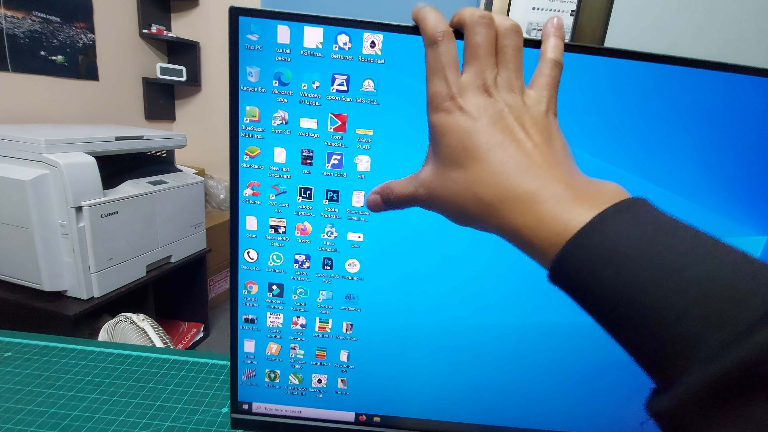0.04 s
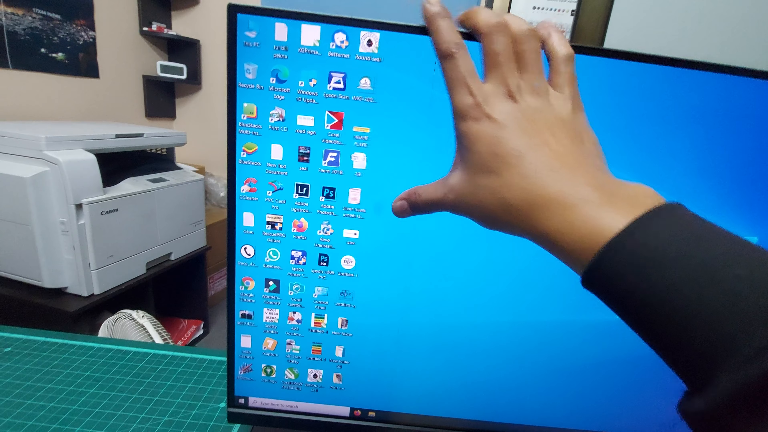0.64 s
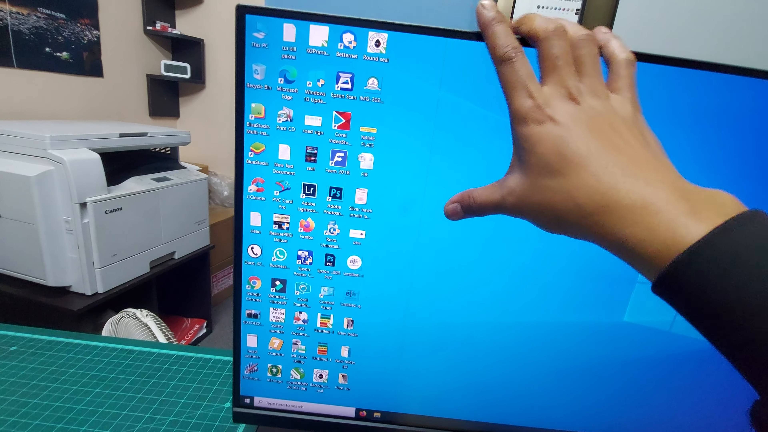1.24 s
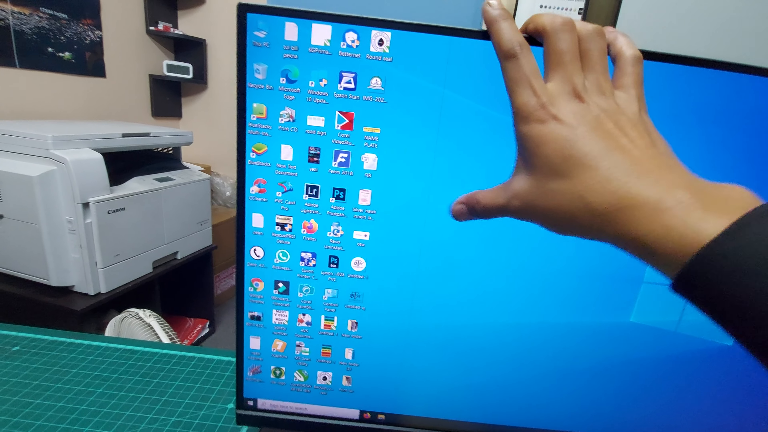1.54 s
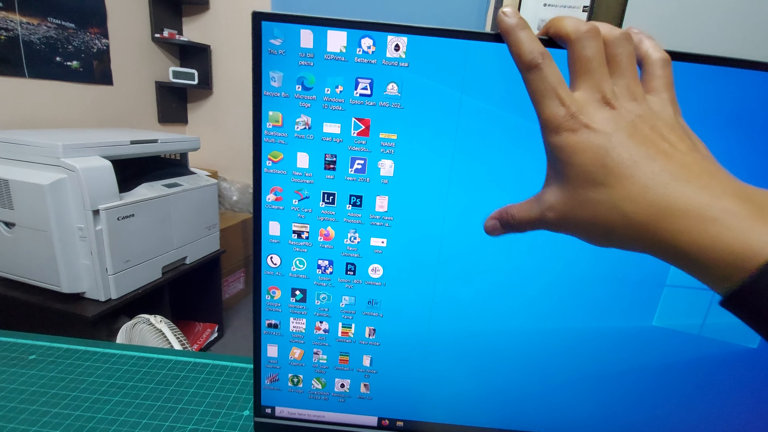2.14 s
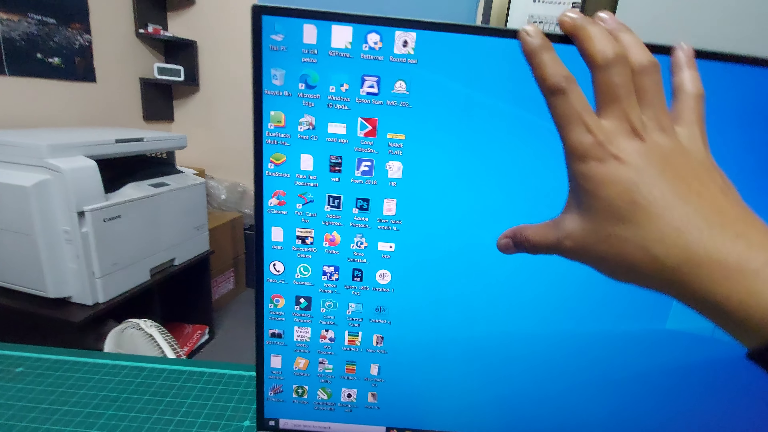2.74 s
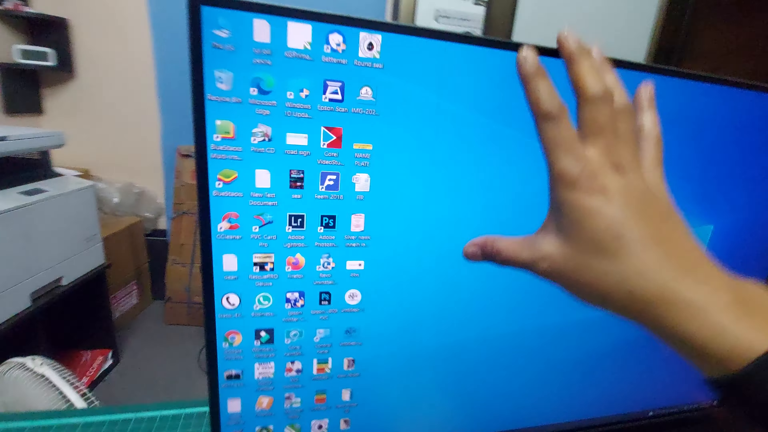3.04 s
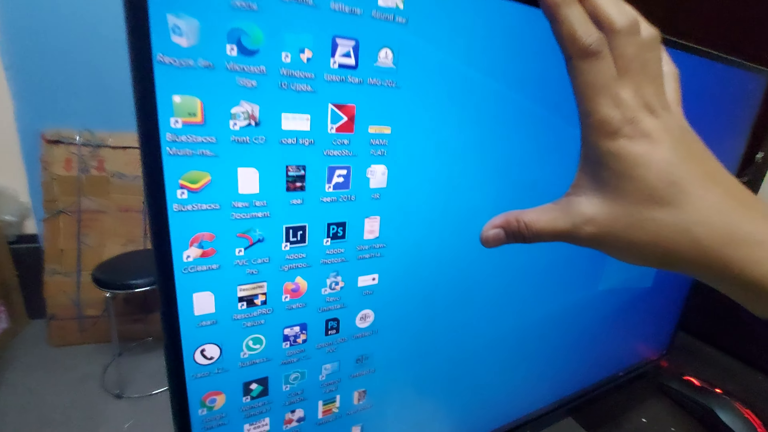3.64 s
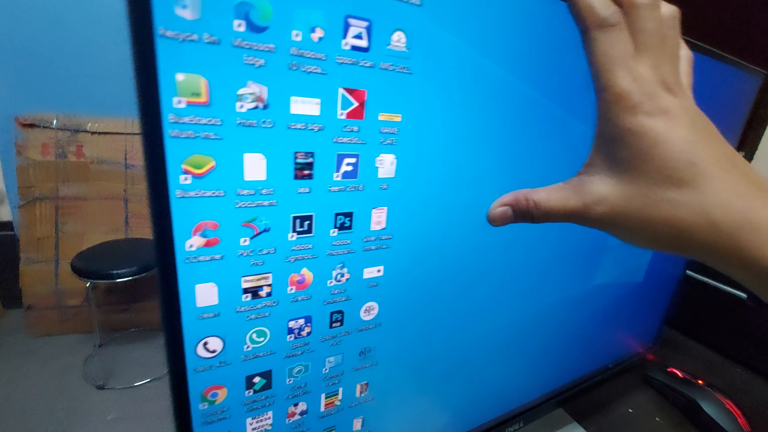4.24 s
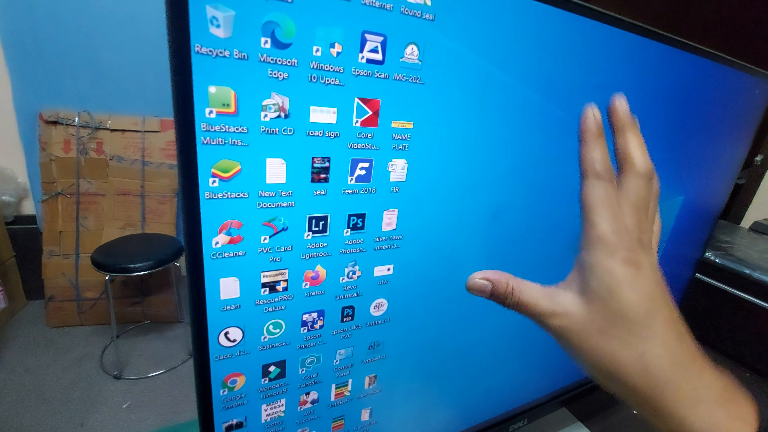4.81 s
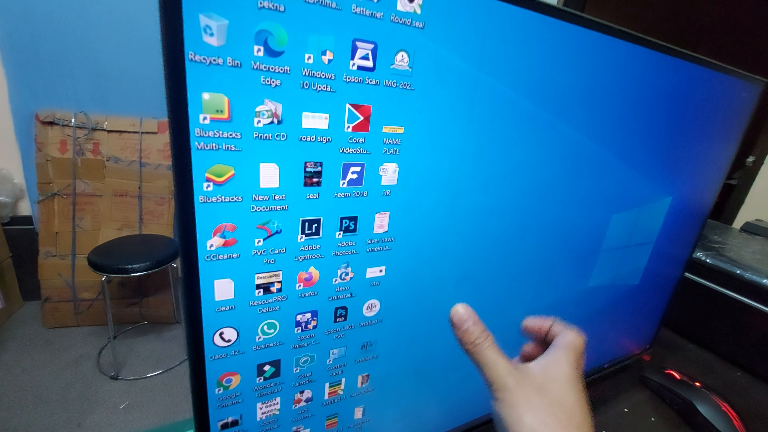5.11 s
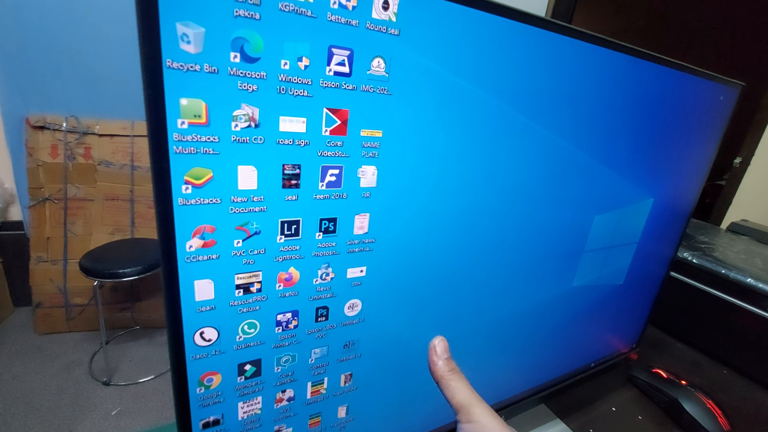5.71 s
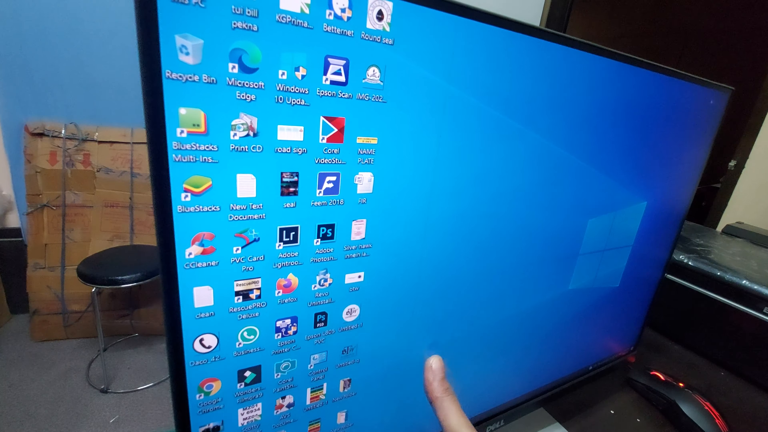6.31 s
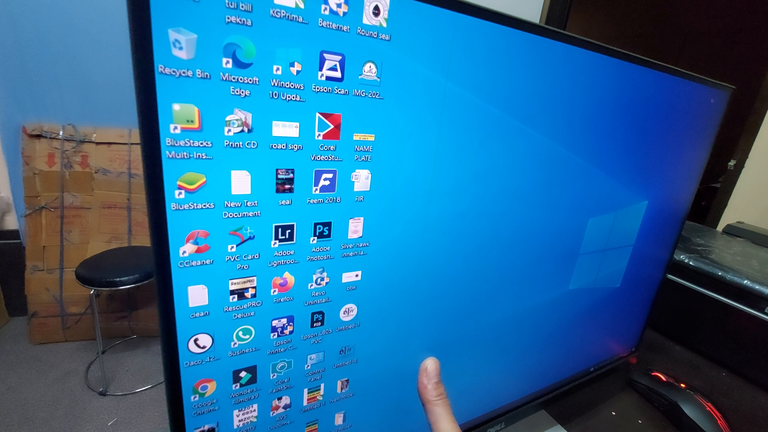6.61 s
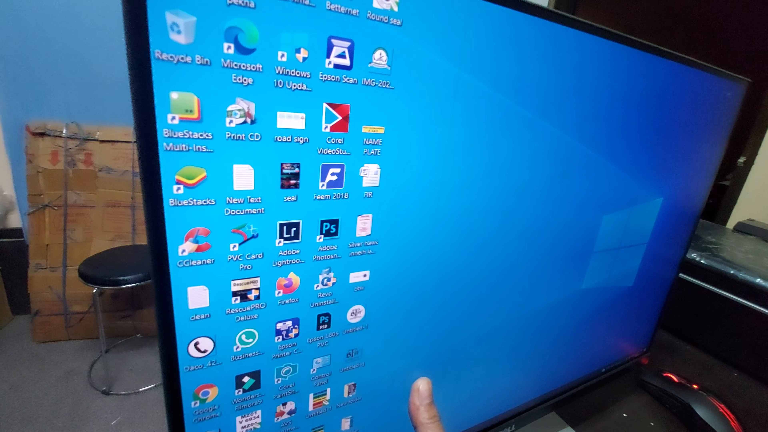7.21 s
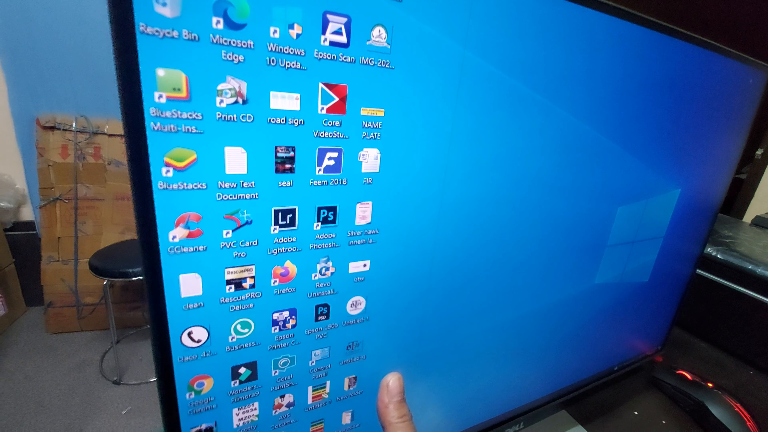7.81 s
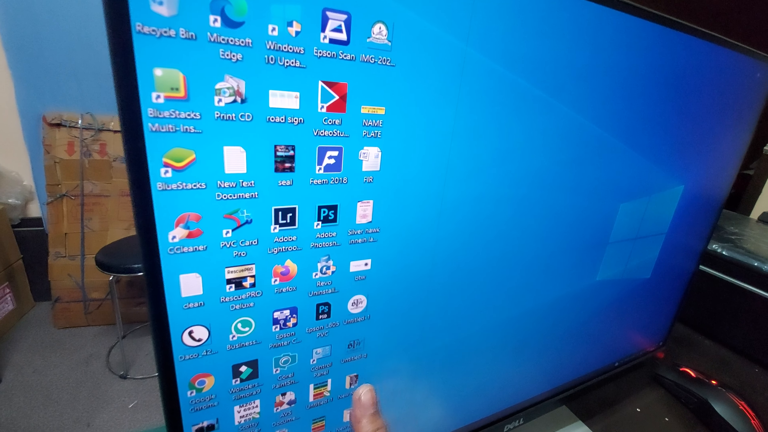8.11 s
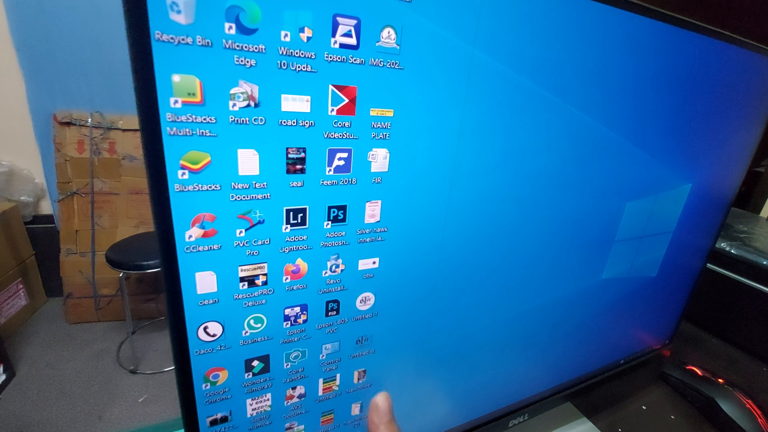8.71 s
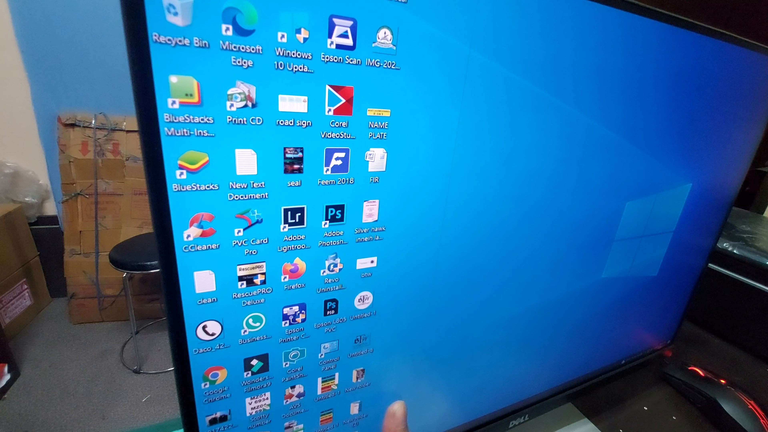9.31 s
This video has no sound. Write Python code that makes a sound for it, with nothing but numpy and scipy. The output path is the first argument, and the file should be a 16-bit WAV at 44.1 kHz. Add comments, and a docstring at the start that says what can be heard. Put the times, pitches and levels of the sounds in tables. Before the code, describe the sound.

A fan hums faintly in a small room while fingertips lightly tap a computer monitor and hiss along its plastic edge. Skin rubs over the screen, and the stand rocks on the desk with a loud, booming rattle, followed by two softer knocks. Further light taps and small sticky scuffs continue, thinning out toward the end. Everything is heard close up through a phone microphone.

```python
"""A hand taps, grips and turns a computer monitor in a small room, close to a phone.
From the start a fan hums and fingertips ring the panel and shell; at 1 s they hiss along the bezel.
From 2.2 s skin rubs over bezel and screen. The stand rocks on the desk at 2.5 s, booming and rattling,
and knocks more softly near 3.3 s and 4.5 s. Then a fingertip sticks and slips among further taps;
the rubbing ends near 8 s, and a last scuff comes at 9.4 s."""
import sys
import numpy as np
from scipy import signal
from scipy.fft import rfft, irfft, next_fast_len
from scipy.io import wavfile
from scipy.ndimage import uniform_filter1d

SR = 44100
rng = np.random.default_rng(int(sys.argv[2]) if len(sys.argv) > 2 else 0)


def store_wav(level_fs):
    """Save 16-bit WAV to argv[1]."""
    pcm = np.round(np.clip(np.atleast_2d(level_fs), -1, 1) * 32767)
    wavfile.write(sys.argv[1], SR, pcm.T.astype(np.int16))


N = 421155
TIME = np.arange(N) / SR
# spectrum of the room's reflections: f/Hz, level/dB
ROOM_SPECTRUM = [(50, -12.5), (200, 1), (600, 4), (1500, 1.5), (4000, 10), (9000, 3), (16000, 2)]
# stereo width of the room's sound field, side against mid: f/Hz, level/dB
ROOM_WIDTH = [(30, 19), (100, -14), (250, -7.5), (500, -3.5), (1000, 1.5), (16000, -0.5)]


def finger_taps(clack_db=2.5, thud_db=4, tick_db=10, room_db=-32.5, travel_s=0.001096):
    """Impact excitation: each tap bends the panel, rings the shell and ticks; scuffs join the taps."""
    # finger contacts: t/s, shell clack level/dB, panel thud level/dB, nail tick level/dB, spot f/Hz
    taps = [(0.105, -57, -57.5, -57, 985), (0.391, -55.5, -50.5, -68, 760), (0.588, -48.5, -44.5, -55, 830),
            (1.073, -43, -44.5, -58, 830), (1.602, -46.5, -41.5, -54, 850), (2.207, -53.5, -57, -64, 935),
            (2.333, -56, -57.5, -70, 940), (2.401, -55, -50.5, -73, 990), (3.505, -48.5, -46, -70, 910),
            (4.059, -47.5, -45.5, -60.5, 856), (4.521, -49, -43, -51, 1000), (4.548, -47, -37, -69, 829),
            (4.64, -46.5, -48.5, -55.5, 865), (5.164, -51, -46.5, -72, 820), (5.239, -39, -61, -69, 1190),
            (5.286, -48, -69, -66, 1190), (5.329, -50, -49, -49, 736), (5.344, -35, -56, -67, 1080),
            (5.404, -40.5, -40.5, -62, 750), (5.544, -43.5, -43, -57, 735), (6.063, -57, -58, -66, 915),
            (6.254, -40.5, -42.5, -58.5, 770), (6.565, -64, -54.5, -67, 900),
            (6.783, -44, -45.5, -59.5, 1040), (7.014, -54.5, -66, -63.5, 925), (7.305, -54, -55, -82, 1100),
            (7.394, -57, -55.5, -56.5, 1070), (7.822, -42, -50, -66, 1730), (7.976, -52.5, -58, -57, 890),
            (8.556, -37, -41, -55, 1100), (8.782, -54.5, -52.5, -89, 1100), (9.123, -44, -46, -59.5, 1080)]
    # bending modes of the whole panel: f/Hz, level/dB, T60/s
    panel_modes = [(63.7, -14.5, 0.42), (108.2, -6.5, 0.061), (209.4, -1, 0.059), (265, -1, 0.076),
                   (339, 6.5, 0.041)]
    s, clack, thud, tick, spot_hz = np.transpose(taps)
    s = s + travel_s
    slips, shell = scuffs()
    for start, db, hz in zip(s, clack + clack_db, spot_hz):
        add(shell, start, undb(db) * shell_response(hz))
    body = shell + drive(blows(s, thud + thud_db), ring(panel_modes, contact_s=0.00053))
    tick_envelope = drive(blows(s, tick + tick_db) + undb(-13) * slips, np.exp(-TIME[:2048] / .0005))
    ticks = tick_envelope * hiss([(500, -37), (2000, 9), (5000, 5.5), (8000, 10), (16000, -51)])
    # each tick excites the room as one clean impulse
    into_room = body + blows(s, tick + tick_db + 10.5) + undb(1) * slips
    walls = drive(into_room, reflections(ROOM_SPECTRUM, build_s=0.00064))
    return body * pan(-6.0) + ticks + undb(room_db) * walls * pan(-1.1)


def shell_response(spot_hz, spot_db=2, spot_t60=0.023, fingertip_hz=2300):
    """Modal weights vary with the point of contact, and the touched spot adds its own resonance."""
    # modes of the plastic shell: f/Hz, level/dB, T60/s
    shell_modes = [(339, -7.5, 0.16), (560, 11, 0.0055), (745, 8.5, 0.0044), (960, -6, 0.027),
                   (1097, 6, 0.0071), (1530, -29, 0.0027), (1774, -4.5, 0.0088)]
    modes = np.array(shell_modes) + np.outer(rng.standard_normal(len(shell_modes)), [0, 1, 0])
    clack = ring([*modes, (spot_hz, spot_db, spot_t60)], contact_s=.00002)
    # a soft fingertip passes on little treble
    return signal.sosfilt(signal.butter(4, fingertip_hz, fs=SR, output="sos"), clack)


def scuffs(slips_per_s=420, scatter_db=4):
    """Stick-slip friction: a fingertip pushes the shell unevenly; returns the force and its sound."""
    # scuffs on the screen: t/s, duration/s, level/dB, rubbed spot f/Hz
    contacts = [(4.562, 0.23, -63.5, 880), (5.324, 0.085, -50, 880), (5.432, 0.031, -61, 755),
                (5.546, 0.0197, -51, 767), (6.559, 0.052, -60, 1040), (7.292, 0.079, -58, 1100),
                (7.7, 0.12, -65, 1000), (7.812, 0.063, -50, 1580), (9.378, 0.092, -63.5, 1320)]
    slipping = rng.random(N) < slips_per_s / SR
    slips = slipping * undb(scatter_db * np.clip(rng.standard_normal(N), -2, 1))
    force, sound = np.zeros(N), np.zeros(N)
    for s, length, db, hz in contacts:
        push = undb(db) * slips[int(s * SR):int(s * SR) + int(length * SR) + 1]
        add(force, s, push)
        add(sound, s, signal.fftconvolve(push, shell_response(hz)))
    return force, sound


def stand_knocks(boom_db=1, clunk_db=-1.0, rattle_db=1, cover_db=-7, room_db=-33):
    """Repeated impacts excite free vibration: the desk booms, the stand clunks, the housing rattles."""
    # blows of the stand on the desk: t/s, boom level/dB, clunk level/dB, rattle level/dB
    knocks = [(2.524, -25, -29, -36.5), (2.530, -37, -41, -32), (2.5374, -15.5, -24.5, -27),
              (2.545, -18, -33, -33), (2.558, -27, -28.5, -23), (2.568, -17.5, -31, -29),
              (2.578, -17, -36.5, -33), (3.249, -54, -38, -48), (3.255, -35, -31, -49),
              (3.275, -36.5, -54, -45), (3.292, -33, -43, -51), (3.304, -41, -39.5, -57),
              (4.551, -35.5, -60, -52)]
    # modes of the desk, the stand and the thin back cover: f/Hz, level/dB, T60/s
    desk_modes = [(54.4, -14.5, 0.78), (78.5, -11.5, 1), (105.2, -7.5, 0.45), (124, -15, 0.49),
                  (145.5, -14, 0.31), (173.3, -2, 0.3), (207.6, 0, 0.5), (215, -2, 0.48), (236, 4, 0.25),
                  (257, 5, 0.17), (273.6, 8.5, 0.067), (294, -18, 0.2)]
    stand_modes = [(357, 4.5, 0.086), (377, -4, 0.11), (395.6, -0.5, 0.14), (440, 3, 0.037),
                   (605.5, -13.5, 0.38)]
    cover_modes = [(602, 22, 0.21), (658, 10, 0.23), (1140, -7, .16), (1460, 9, 0.26), (1702, 1, 0.17),
                   (1730, -19, 0.19), (2430, -7, 0.15), (2650, -1.5, .2), (2680, -4, .2), (2785, 6, 0.17),
                   (3010, -11, .2), (3140, -19, 0.35), (3780, -8, .25)]
    # spectrum of the housing's rattle: f/Hz, level/dB
    rattle_spectrum = [(25, -55), (60, -16), (150, 12.5), (300, 8.5), (450, -11), (700, 4), (1100, -4),
                       (1700, -7), (2200, -9.5), (2900, -11.5), (4000, -18), (5200, -25.5), (7000, -38.5),
                       (15000, -62)]
    s, boom, clunk, rattle = np.transpose(knocks)
    clatter = reflections(rattle_spectrum, build_s=0.0014) * (1 + 3.05 * np.exp(-TIME[:SR] / 0.013))
    clatter = clatter / np.sqrt(np.mean(clatter[:, :2048] ** 2)) / 2
    desk = drive(blows(s, boom + boom_db), ring(desk_modes, contact_s=0.00026))
    stand = drive(blows(s, clunk + clunk_db), ring(stand_modes, contact_s=0.0001))
    housing = undb(rattle_db) * drive(blows(s, rattle), clatter)
    # the loose cover chatters for a few milliseconds after each blow
    chatter_envelope = drive(blows(s, rattle + cover_db), np.exp(-TIME[:2048] / 0.0062))
    chatter = chatter_envelope * rng.standard_normal((2, N)) / 10
    cover = drive(chatter, ring(cover_modes, contact_s=.00001))
    walls = undb(room_db) * drive(stand + desk / 2, reflections(ROOM_SPECTRUM, build_s=0.0084))
    return desk * pan(0.66) + stand + (housing + cover) * pan(-1.7) + walls


def skin_rubbing(grain_db=1.0, low_db=-1, peak_share=0.39, speed_power=1.18):
    """Friction noise: skin catches on tiny ridges, and the hiss grows as a power of the hand's speed."""
    # strokes over bezel and screen: t/s, duration/s, high hiss level/dB, low hiss against it/dB
    strokes = [(2.223, 0.33, -75, 4.5), (2.37, 0.59, -71, 7), (2.817, 0.33, -65.5, 1),
               (3.037, 0.6, -60, 0.5), (3.51, 0.37, -79, 6), (4.049, 0.075, -69, 0),
               (4.502, 0.34, -54.5, -8), (4.69, 0.2, -56.5, -14), (4.887, 0.14, -57, -20),
               (4.95, 0.66, -64.5, 2), (5.54, 0.095, -70.5, 3), (5.648, 0.14, -65.5, 1),
               (6.048, 0.072, -67.5, -11), (6.752, 0.27, -70, 4.5), (7.09, 0.51, -86, 16.5),
               (7.362, 0.21, -62.5, -2.5), (7.67, 0.23, -70.5, 5.5)]
    # spectra of the high and the low hiss: f/Hz, level/dB
    high_spectrum = [(2000, -10.5), (5000, -7.5), (8000, -5.5), (11000, -2), (14500, -2), (16000, -8.5)]
    low_spectrum = [(700, 3), (1500, -1.5), (3000, -1), (6000, 0.5), (9000, -11.5), (16000, -57)]
    high, low = np.zeros(N), np.zeros(N)
    for s, length, db, relative_db in strokes:
        friction = hand_speed(s, length, peak_share) ** speed_power
        high = np.hypot(high, undb(db) * friction)
        low = np.hypot(low, undb(db + relative_db + low_db) * friction)
    grain = undb(grain_db * unit(uniform_filter1d(rng.standard_normal(N), size=60)))
    return grain * (lingering(high) * hiss(high_spectrum) + lingering(low) * hiss(low_spectrum))


def bezel_slides(slow_hz=8600, width_hz=620, wobble=.02, flutter_db=1.5, speed_power=1.17):
    """Roughness noise: the bezel's grain passes under the fingers; pitch and level rise with speed."""
    # slides along the bezel: t/s, duration/s, level/dB, top grain rate f/Hz
    slides = [(0.989, 0.48, -64.5, 11600), (1.46, 0.33, -66, 11950), (2.048, 0.17, -74, 9900)]
    level, grain_hz = np.zeros(N), np.full(N, float(slow_hz))
    for s, length, db, top_hz in slides:
        speed = hand_speed(s, length, peak_share=0.44)
        level += undb(db) * speed ** speed_power
        grain_hz += (top_hz - slow_hz) * speed ** .6  # the rate levels off towards its top
    phase = 2 * np.pi * np.cumsum(grain_hz * (1 + wobble * drift(25))) / SR
    level = level * undb(flutter_db * drift(35))  # the fingers never move quite evenly
    baseband = hiss([(width_hz / 2, 0), (width_hz, -4), (4 * width_hz, -22), (16000, -50)])
    narrow = unit(baseband * np.cos(phase))
    broad = hiss([(1500, -15), (4000, -8), (7000, -0.5), (10000, 0.0), (16000, -8.0)])
    return level * narrow + lingering(level) * broad


def fan(blade_hz=504.8, blade_db=-1, waver=0.148, port_phase_rad=0.64):
    """Flow noise and rotation tones: steady moving air, a wavering blade tone, weaker motor tones."""
    # spectrum of fan and room air: f/Hz, level/dB
    air_spectrum = [(25, -41), (50, -8), (80, 3), (120, 1.5), (160, -1.5), (240, 2), (350, -5), (520, -3.5),
                    (750, -14), (1100, -20.5), (1600, -28.5), (3000, -34), (9000, -38.5), (13500, -46.5),
                    (15500, -33)]
    # course of the blade tone: t/s, level/dB
    blade_levels = [(0, -68.5), (3.1, -66.5), (3.7, -62.5), (5.4, -62.5), (6.8, -63), (9.55, -64)]
    mid, side = hiss(air_spectrum)
    swell = undb(.8 * drift(5))
    left, right = unit(mid + np.array([[1], [-1]]) * colour(side, ROOM_WIDTH)) * undb(-61) * swell
    left = colour(left, [(100, -10), (500, -1.0), (1500, -3), (6000, 4.5)])
    air = np.array([left, undb(3.5) * right])
    # a standing wave in the room meets the two microphone ports out of step
    phase = 2 * np.pi * np.cumsum(blade_hz + 1.21 * drift(9)) / SR + np.array([[0], [port_phase_rad]])
    level = undb(np.interp(TIME, *np.transpose(blade_levels)) + blade_db) * (1 + waver * drift(16))
    blade = np.sqrt(2) * np.sin(phase) * level
    motor = sum(undb(db) * np.sin(2 * np.pi * hz * TIME + drift(6))
                for hz, db in [(101, -73), (242, -74.5), (433, -79)])
    return air + blade + motor


def reflections(spectrum, build_s):
    """Reverberation: dense echoes build up, then decay exponentially at a rate set band by band."""
    # reverberation time of the room: f/Hz, T60/s
    room_t60 = [(100, 0.63), (500, 0.4), (2500, 0.51), (12000, 0.74)]
    t, hz = TIME[:SR], np.fft.rfftfreq(SR, 1 / SR)
    mid, side = rfft(rng.standard_normal((2, SR)))
    width = undb(on_log(hz, ROOM_WIDTH))
    field = (mid + np.array([[1], [-1]]) * side * width) / np.sqrt(1 + width ** 2)
    field = field * undb(on_log(hz, spectrum))
    centres = np.geomspace(60, 16000, 8)
    tail = 0
    for centre, share in zip(centres, np.eye(len(centres))):
        band = irfft(field * on_log(hz, np.c_[centres, share]), SR)
        tail = tail + band * np.exp(-np.log(1000) * t / on_log(centre, room_t60))
    return tail * (1 - np.exp(-t / build_s)) ** 2


def lingering(level, room_db=-9, room_t60=.45):
    """Incoherent addition: a hiss's envelope and the room's fading answer sum in power."""
    retention = np.exp(-2 * np.log(1000) / (room_t60 * SR))
    room_power = signal.lfilter([1 - retention], [1, -retention], level ** 2 + 1e-18)
    return np.sqrt(level ** 2 + undb(room_db) ** 2 * room_power)


def ring(modes, contact_s):
    """Superposition of damped modes after one push; a longer contact is duller."""
    t = TIME[:int(1.5 * SR * max(t60 for hz, db, t60 in modes))]
    y = -sum(undb(db) * np.sin(2 * np.pi * hz * t) * np.exp(-np.log(1000) * t / t60)
             for hz, db, t60 in modes)
    for _ in range(2):
        y = signal.lfilter([1], [1, -np.exp(-1 / (contact_s * SR))], y)
    # slow motion radiates little sound
    y = signal.sosfilt(signal.butter(2, modes[0][0], "high", fs=SR, output="sos"), y)
    return y / np.abs(y).max()


def hand_speed(start_s, length_s, peak_share):
    """Speed (0-1) of one movement: acceleration up to peak_share of its length, then deceleration."""
    peak_s = start_s + length_s * peak_share
    return np.sin(np.pi / 2 * np.interp(TIME, [start_s, peak_s, start_s + length_s], [0, 1, 0]))


def blows(times, db):
    """Ideal impacts: one impulse for each contact."""
    force = np.zeros(N)
    np.add.at(force, np.clip(np.round(times * SR).astype(int), 0, N - 1), undb(db))
    return force


def drive(force, response):
    """Convolution of a force with an impulse response."""
    return signal.fftconvolve(np.atleast_2d(force), np.atleast_2d(response), axes=-1)[:, :N]


def add(track, s, sound):
    """Superpose a sound on a track at s seconds."""
    start = int(s * SR)
    part = sound[:max(N - start, 0)]
    track[start:start + len(part)] += part


def hiss(spectrum):
    """Coloured noise, uncorrelated left and right."""
    return unit(colour(rng.standard_normal((2, N)), spectrum))


def colour(x, spectrum):
    """Zero-phase filtering by a spectrum of (f/Hz, level/dB) points."""
    size = next_fast_len(x.shape[-1])
    gain = undb(on_log(np.fft.rfftfreq(size, 1 / SR), spectrum))
    return irfft(rfft(x, size) * gain, size)[..., :x.shape[-1]]


def on_log(hz, points):
    """Interpolate (f/Hz, value) points on a log-frequency axis."""
    f, value = np.transpose(points)
    return np.interp(np.log(hz + 1e-9), np.log(f), value)


def drift(rate_hz):
    """Slow random modulation with a spread near 1."""
    knots = rng.standard_normal(400)
    return 1.24 * np.interp(TIME * rate_hz, np.arange(len(knots)), knots)


def pan(db):
    """Channel gains for a left-minus-right level difference."""
    return undb(np.array([[db], [-db]]) / 2)


def undb(db):
    """Decibels to amplitude ratio."""
    return 10 ** (np.asarray(db) / 20)


def unit(x):
    """Normalise to an rms of 1."""
    return x / np.sqrt(np.mean(x ** 2))


def scene():
    """Linear superposition of hand, monitor and fan."""
    return finger_taps() + stand_knocks() + skin_rubbing() + bezel_slides() + fan()


def record(dry):
    """Band limiting: the phone cuts off the deepest bass and the highest treble."""
    thin = signal.sosfilt(signal.butter(4, 36, "high", fs=SR, output="sos"), dry)
    return signal.sosfilt(signal.ellip(10, .2, 70, 15950, fs=SR, output="sos"), thin)


dry = scene()
out = record(dry)
store_wav(out)
```